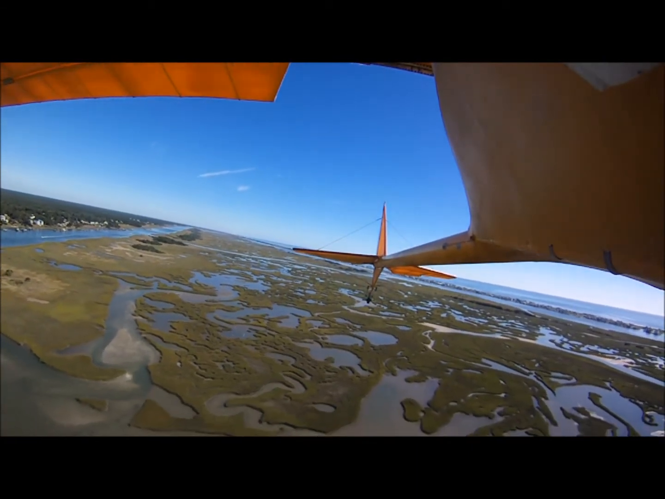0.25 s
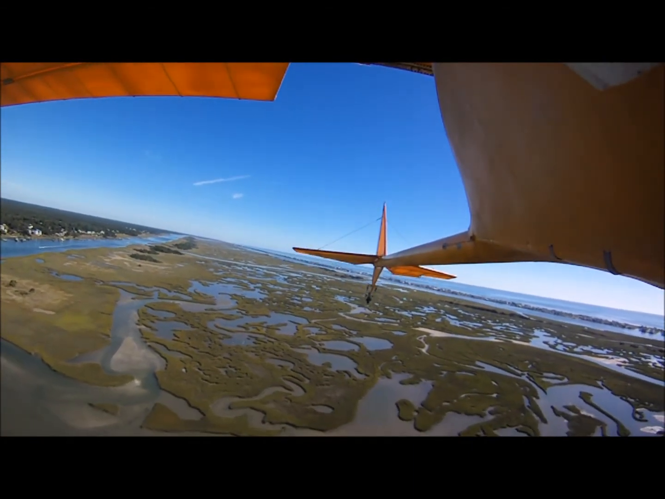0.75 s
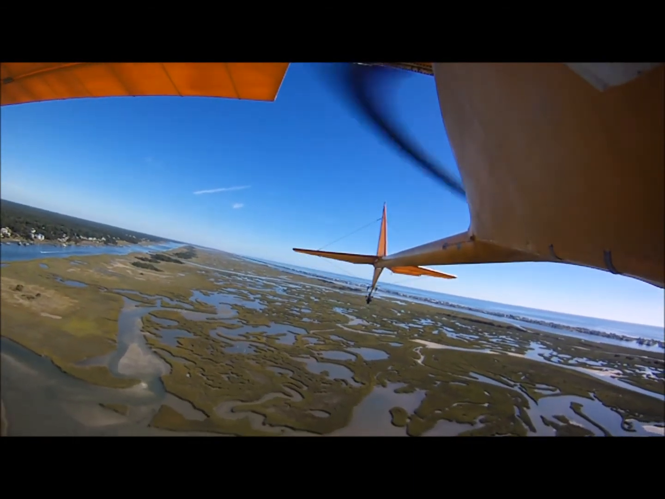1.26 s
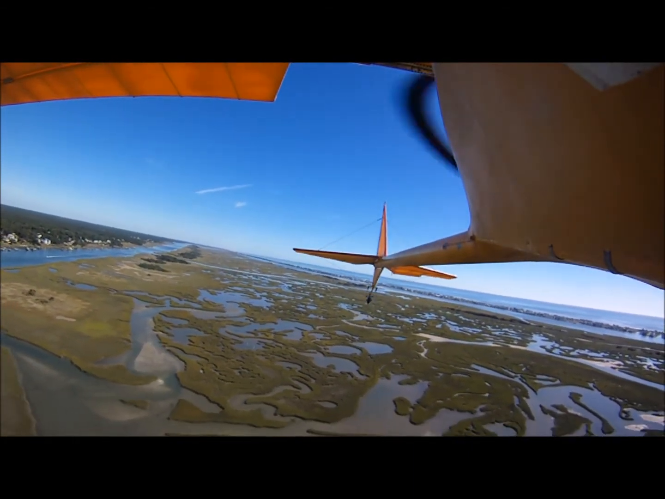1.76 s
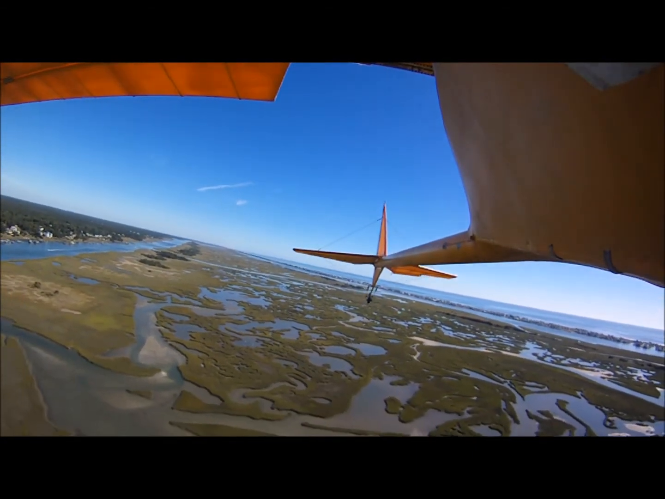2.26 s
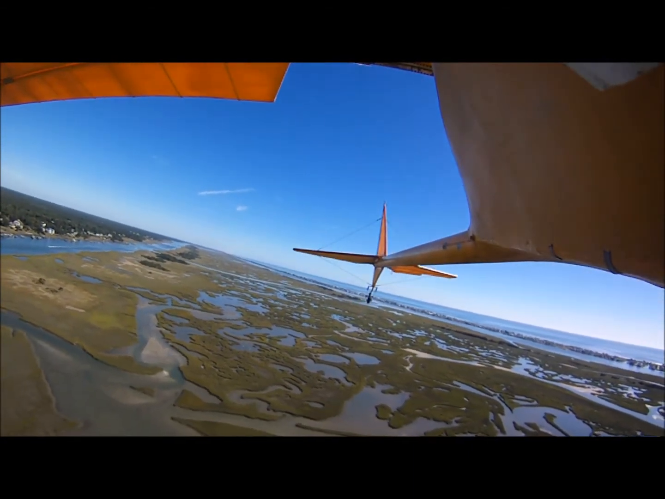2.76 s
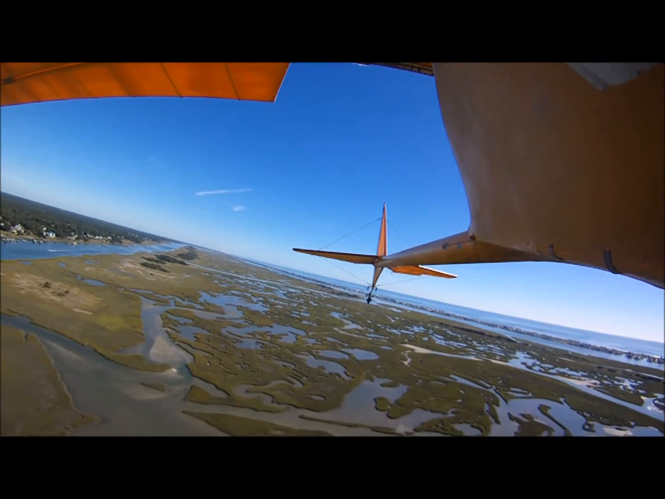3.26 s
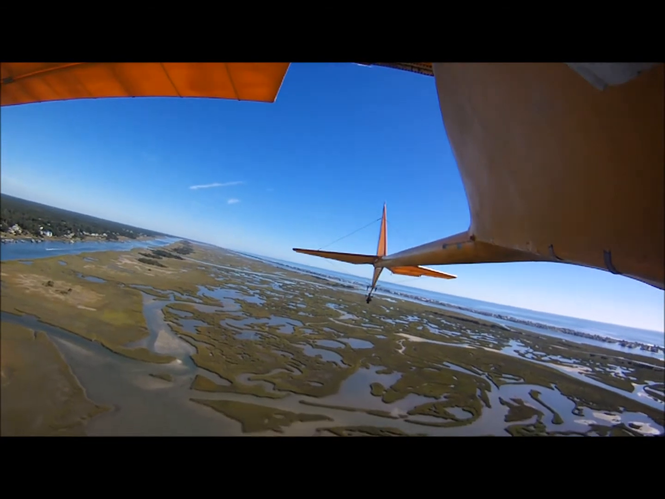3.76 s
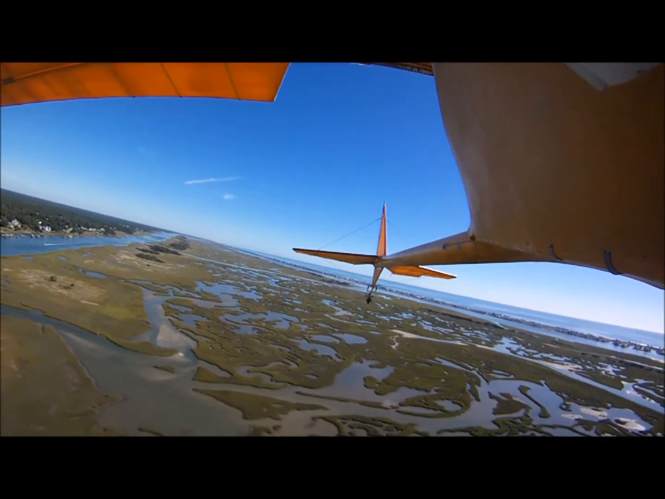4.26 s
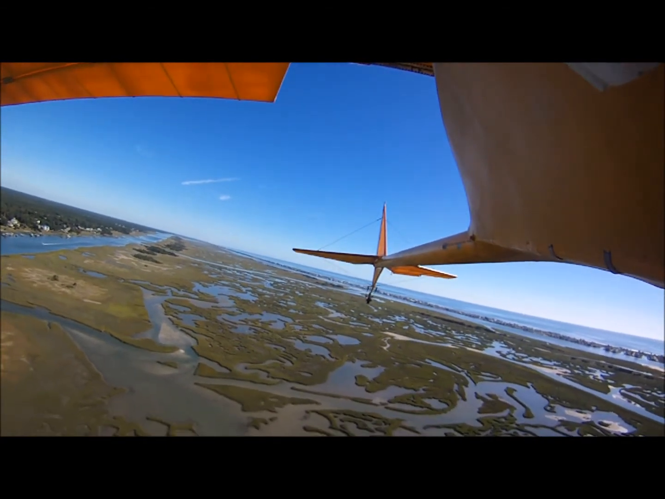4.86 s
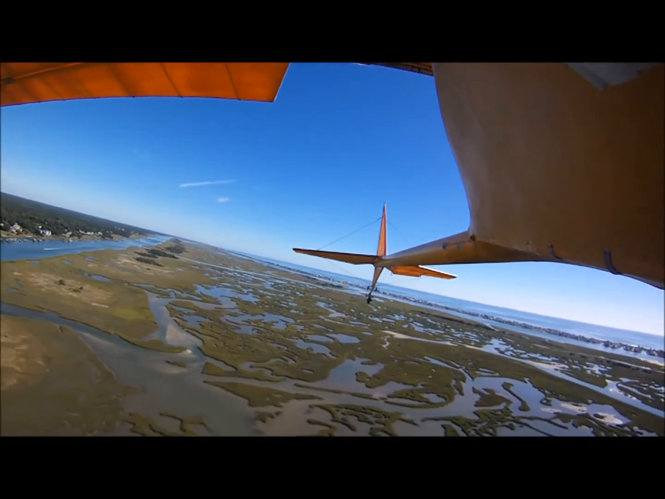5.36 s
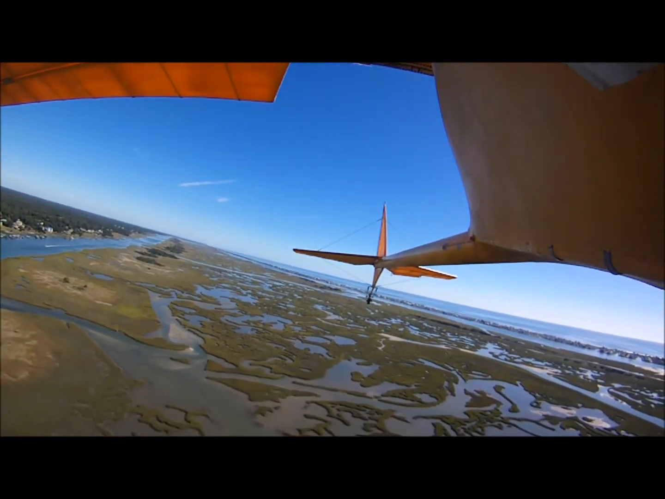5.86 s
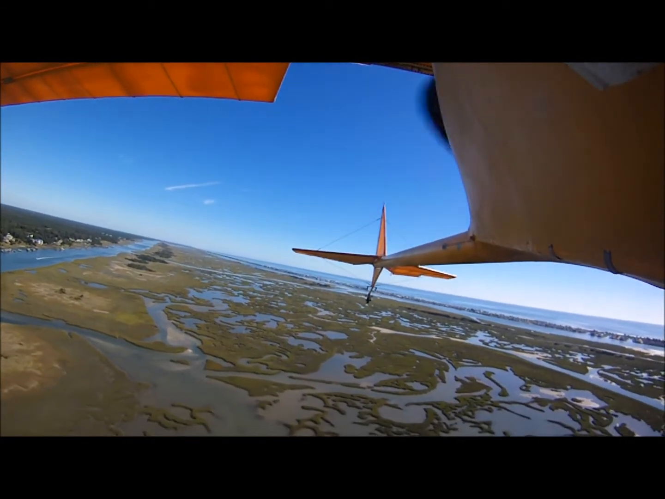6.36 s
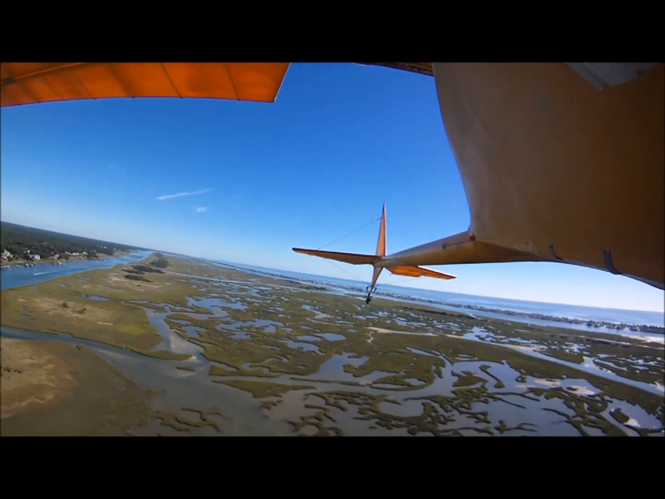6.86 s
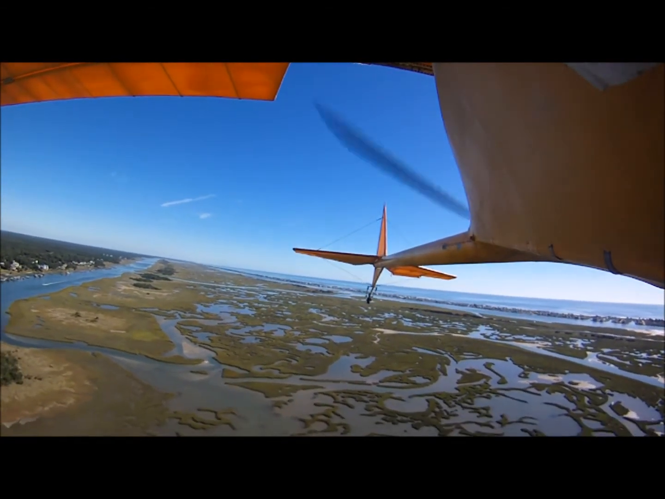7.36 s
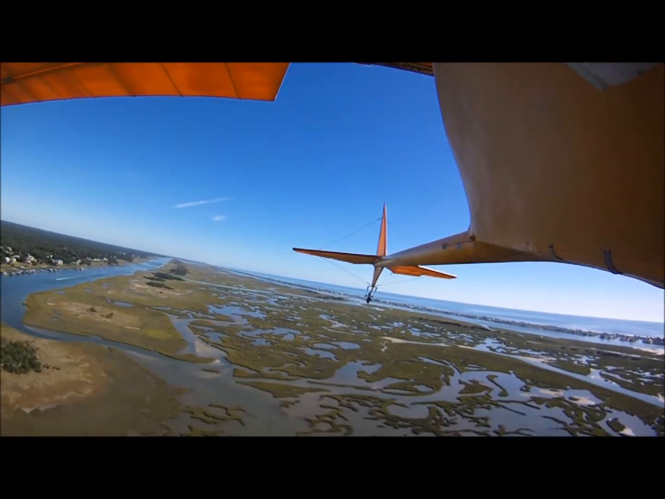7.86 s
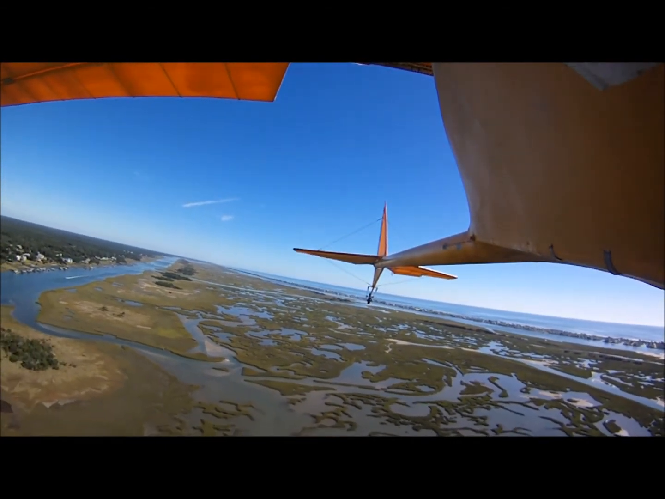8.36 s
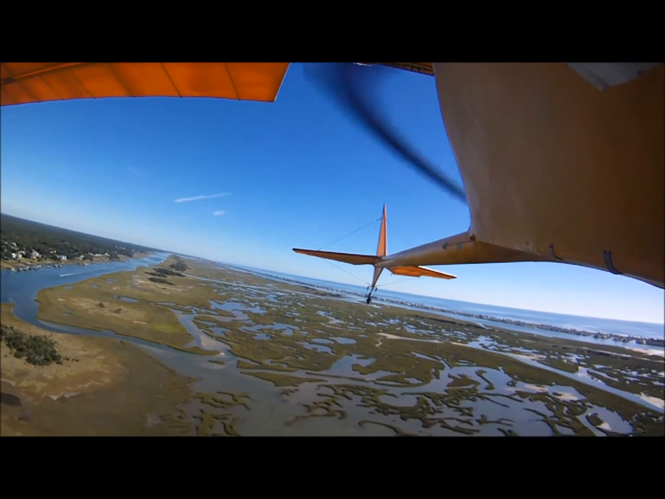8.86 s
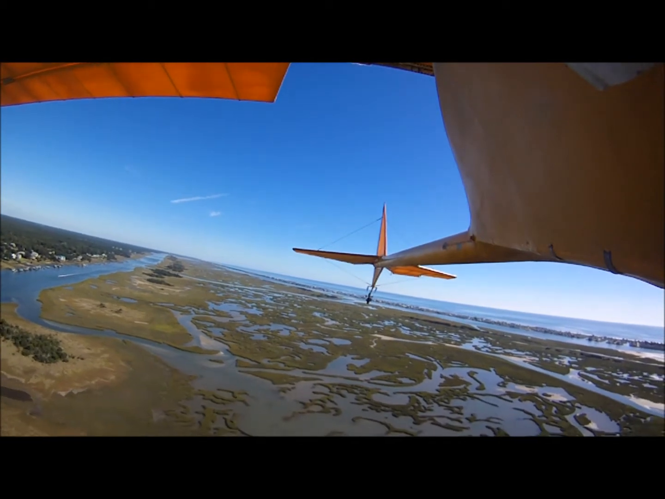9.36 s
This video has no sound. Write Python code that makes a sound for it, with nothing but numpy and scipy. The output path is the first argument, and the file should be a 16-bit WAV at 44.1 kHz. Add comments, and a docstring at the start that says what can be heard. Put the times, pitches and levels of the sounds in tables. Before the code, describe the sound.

From 0 to about 9.6 seconds, a small propeller aircraft flies at steady power, heard from a microphone fixed to its airframe. About 72 blade slaps per second merge into a rough, low buzzing drone, strongest in overtones around 300 Hz, with tiny speed drifts and uneven slaps. The engine's firing note, near 187 Hz, and its overtones beat against the propeller, giving a restless throb. A dense, grainy slipstream roar fills the lows and mids, with faint hiss, fizz and crackle above. The air builds very gradually, lifting slightly near 2.7 seconds and more clearly around 7.25. Short low wind buffets bump at about 1.6, 3.1, 4.7, 5.6, 6.2, 7.1 to 7.3 and 8.8 seconds. Small dry ticks occur sparsely, notably near 2.45, 5.6 and 8.8. The sound is close, open and echo-free, with muted extreme treble, and the drone never stops.

```python
"""A propeller drives an ultralight aircraft at steady power, heard from a camera on its airframe.
Each blade slaps the air, built as a row of harmonics that line up into a pulse.
The engine, geared to the propeller, fires about 2.6 times per blade pass and beats against it.
The slipstream is coloured noise, pulsing with the blades and swelling in gusts, with fizz and crackle on top.
Low wind buffets come in short swells, and now and then a small dry burst ticks."""
import sys
import numpy as np
from scipy import signal
from scipy.fft import rfft, irfft
from scipy.io import wavfile

SR = 44100
rng = np.random.default_rng(int(sys.argv[2]) if len(sys.argv) > 2 else 0)


def master_out(mix):
    """Clip the mix to full scale and print it as 16-bit PCM to the path in sys.argv[1]."""
    frames = np.transpose(np.atleast_2d(mix))
    ceiling = np.clip(frames, -1, 1)
    pcm = np.round(ceiling * 32767).astype(np.int16)
    wavfile.write(sys.argv[1], SR, pcm)


N = 424683
TIME = np.arange(N) / SR  # seconds

# propeller speed: (time [s], blade passes per second [Hz])
BLADE_RATE = [(0.0, 72.5), (0.21, 72.1), (0.43, 72.6), (1.21, 72.6), (1.42, 71.8), (2.38, 72.5),
              (3.19, 71.6), (4.29, 72.7), (6.03, 72.4), (7.59, 72.9), (7.94, 72.6), (9.63, 72.4)]
# propeller harmonics before bite and waver: (multiple of the blade rate [-], level [dB])
BLADE_HARMONICS = [(1, -46.4), (2, -36.1), (3, -36.4), (4, -29.0), (5, -29.7), (6, -43.8), (7, -33.1),
                   (8, -34.7), (9, -42.4), (10, -43.1), (11, -44.6), (12, -39.3), (13, -44.9), (14, -39.0),
                   (15, -44.5), (16, -40.2), (17, -46.8), (18, -43.4), (19, -50.7), (20, -46.3),
                   (21, -48.7), (22, -58.5), (23, -48.4), (24, -55.0), (25, -54.4), (26, -69.6),
                   (27, -55.7), (28, -57.4), (29, -54.0), (30, -53.2)]
# exhaust overtones before trim and waver: (multiple of the firing rate [-], level [dB])
EXHAUST_HARMONICS = [(.5, -58), (1, -34), (2, -31), (3, -38), (4, -46), (5, -53), (6, -48.5), (7, -44.5),
                     (8, -53.5)]
# broad gusts that lift all the steady air noise: (time [s], lift [dB], half length [s])
BROAD_GUSTS = [(2.7, 0.7, 0.31), (7.25, 1.5, 0.35)]
# relative spectrum of the slipstream's roar: (frequency [Hz], density [dB per Hz])
ROAR_COLOUR = [(20, -30), (50, -12), (90, -7), (160, -1.5), (450, 0.5), (800, 0), (1100, -2.5), (1500, -4),
               (2150, -9), (2600, -15), (3100, -22), (4500, -35.5), (8000, -55)]
# relative spectrum of the slipstream's hiss: (frequency [Hz], density [dB per Hz])
HISS_COLOUR = [(500, -22), (2500, 2), (3800, 0.5), (4800, -1), (6000, -5), (7400, -10), (9300, -12),
               (10200, -15.5), (11000, -19.5), (12600, -26), (13800, -27), (14600, -30), (15200, -35)]
# relative spectrum of the fizz at each blade: (frequency [Hz], density [dB per Hz])
FIZZ_COLOUR = [(2000, -20), (4500, -2), (7000, -3), (9500, 3.5), (11500, -10), (15000, -22)]
# relative spectrum of a snap or an untilted tick: (frequency [Hz], density [dB per Hz])
SNAP_COLOUR = [(500, -10), (2500, 2), (4200, 8.5), (6500, -2.5), (9000, -10.5), (12000, -26), (15000, -40)]
# gusts that buffet the camera, before the layer trim: (time [s], level [dB], half length [s])
BUFFET_SWELLS = [(1.587, -19.5, 0.028), (3.14, -23, 0.029), (4.72, -19, 0.017), (5.619, -18.5, 0.019),
                 (6.215, -21, .03), (6.388, -24, 0.028), (7.105, -24, 0.035), (7.18, -21.5, 0.03),
                 (7.26, -21, 0.027), (8.841, -20.5, 0.016)]
# relative spectrum of a buffet: (frequency [Hz], density [dB per Hz])
BUFFET_SPECTRUM = [(30, -25), (120, 3), (250, 1), (600, 10), (1200, -13), (2500, -17), (5000, -39),
                   (12000, -65)]
# small dry ticks, before the layer trim: (time [s], level [dB], brightness [dB per octave])
TICK_EVENTS = [(1.594, -34, -3), (2.4293, -30, -1), (2.4628, -33, -4), (2.467, -25, -5), (4.726, -31, -3),
               (5.606, -27, 4), (6.0135, -34, -2), (6.1937, -35, 2), (7.2393, -31, -5), (7.4508, -33, -3),
               (7.5228, -32, -1), (8.193, -33, -2), (8.8058, -25, 1)]

FIRINGS_PER_BLADE = 2.579
# air noise levels halfway through, between gusts; the airflow then grows slowly and evenly
ROAR_DB, HISS_DB, AIRFLOW_RISE_DB_PER_S = -24, -49, 0.1969
HISS_GROWTH = 1.3  # dB of hiss for each dB of roar as the air quickens
EDGE_HZ = 14950


def amp(db):
    """Decibels to gain."""
    return 10 ** (np.asarray(db) / 20)


def unit(x):
    """Scales to an rms of one."""
    return x / np.sqrt(np.mean(x ** 2) + 1e-20)


def curve(table):
    """A timed table, read at every sample."""
    return np.interp(TIME, *np.transpose(table))


def colour(x, points):
    """Filters x by a spectrum drawn on a log-frequency axis."""
    hz, db = np.transpose(points)
    bins = np.fft.rfftfreq(len(x), 1 / SR)
    gain = amp(np.interp(np.log(bins + 1), np.log(hz), db))
    return irfft(rfft(x) * gain, len(x))


def wander(rate_hz):
    """Smooth random drift of rms one, fading out above roughly the given rate."""
    coarse = TIME[::32]
    bins = np.fft.rfftfreq(len(coarse), coarse[1])
    smoothing = np.exp(-(bins / rate_hz) ** 2)
    drift = irfft(rfft(rng.standard_normal(len(coarse))) * smoothing, len(coarse))
    return np.interp(TIME, coarse, unit(drift))


def swells(table):
    """Sums the table's bell-shaped swells, with their heights still to be read as (time, height, half length)."""
    return sum(height * np.exp(-((TIME - s) / length) ** 2) for s, height, length in table)


def airflow(waver_db=0.19):
    """Strength of the slipstream in dB: a slow rise, broad gusts and a slight waver."""
    rise = AIRFLOW_RISE_DB_PER_S * (TIME - TIME.mean())
    return rise + swells(BROAD_GUSTS) + waver_db * wander(rate_hz=3)


def slap_phases(levels_db, size=128):
    """Minimum phases, which make a row of harmonics one sudden pulse with its ringing behind it."""
    padding = (1, size - len(levels_db))
    log_gain = np.log(amp(np.pad(levels_db, padding, constant_values=min(levels_db))))
    mirrored = np.r_[log_gain, log_gain[-2:0:-1]]
    return -signal.hilbert(mirrored).imag[1:len(levels_db) + 1]


def propeller(turns, air_db, bite_db=0.08, unevenness=0.11, waver_db=1.0, jitter=0.0026,
              gust_share=0.4, suction=1.17, scatter=0.52):
    """Blades cut the disturbed air behind the wing, so no two slaps are quite alike."""
    orders, levels_db = np.transpose(BLADE_HARMONICS)
    # a sharper slap lifts the upper harmonics, by bite_db per octave above the strongest
    levels_db = levels_db + bite_db * np.log2(orders / orders[levels_db.argmax()])
    # jitter is in blade passes; suction and scatter are in radians
    angle = 2 * np.pi * (turns + jitter * wander(rate_hz=16))
    # pressure dips just ahead of each slap; reflections from the airframe smear it
    phases = slap_phases(levels_db) - suction + scatter * rng.standard_normal(len(levels_db))
    slaps = sum(amp(db + waver_db * wander(rate_hz=2.0)) * np.cos(k * angle + phase)
                for k, db, phase in zip(orders, levels_db, phases))
    slap_strength = 1 + unevenness * wander(rate_hz=66)
    return np.sqrt(2) * slaps * slap_strength * amp(gust_share * air_db)


def exhaust(turns, level_db=0.17, waver_db=0.5, jitter=0.0067):
    """The firing note and its overtones; the second beats against the fifth blade harmonic."""
    # jitter is in firings
    angle = 2 * np.pi * (FIRINGS_PER_BLADE * turns + jitter * wander(rate_hz=24))
    note = sum(amp(db + waver_db * wander(rate_hz=5)) * np.cos(k * angle + 2 * np.pi * rng.random())
               for k, db in EXHAUST_HARMONICS)
    return np.sqrt(2) * amp(level_db) * note


def blade_decay(turns, decay):
    """A jump as each blade passes, dying within a fraction of the gap to the next."""
    return np.exp(-(turns % 1) / decay)


def blade_gate(turns, depth, decay):
    """Steady air with an added burst at each blade, scaled to an rms of one."""
    return unit(1 + depth * blade_decay(turns, decay))


def roar(turns, eddies, air_db, eddy_db=0.77, grain_db=1.0):
    """Grainy, turbulent slipstream, a little louder at each blade."""
    flutter = amp(eddy_db * eddies + grain_db * wander(rate_hz=420))
    air = rng.standard_normal(N) * blade_gate(turns, depth=0.3, decay=0.058) * flutter
    return unit(colour(air, ROAR_COLOUR)) * amp(ROAR_DB + air_db)


def hiss(turns, eddies, air_db, eddy_db=0.85, grain_db=1.1):
    """Fine air noise that flutters with the same eddies as the roar."""
    flutter = amp(eddy_db * eddies + grain_db * wander(rate_hz=400))
    air = rng.standard_normal(N) * blade_gate(turns, depth=0.27, decay=0.099) * flutter
    return unit(colour(air, HISS_COLOUR)) * amp(HISS_DB + HISS_GROWTH * air_db)


def fizz(turns, level_db=-64, spread_db=3):
    """Each blade leaves a brief spit of treble, now weak, now strong."""
    spits = blade_decay(turns, decay=0.19) * amp(spread_db * wander(rate_hz=52))
    return amp(level_db) * unit(colour(rng.standard_normal(N) * spits, FIZZ_COLOUR))


def crackle(air_db, level_db=-61.0, per_second=70, spread_db=3.2, gust_growth=2.2):
    """Tiny random snaps in the wind, stronger when the airflow rises."""
    sizes = amp(spread_db * np.minimum(rng.exponential(1, N), 4))
    struck = rng.random(N) < per_second / SR
    snaps = colour(sizes * struck, SNAP_COLOUR)
    return unit(snaps * amp(gust_growth * air_db)) * amp(level_db)


def buffets(level_db=-2):
    """Gusts buffet the camera as short swells of low wind noise."""
    swell = swells([(s, amp(db), length) for s, db, length in BUFFET_SWELLS])
    return amp(level_db) * swell * unit(colour(rng.standard_normal(N), BUFFET_SPECTRUM))


def ticks(level_db=-1, length_s=0.00091, size=2048):
    """Short bursts of noise with no ring, each peaking after half of length_s."""
    out = np.zeros(N + size)
    age = (np.arange(size) - size // 2) / SR
    rise = 2 * np.maximum(age, 0) / length_s
    shape = rise * np.exp(1 - rise)
    for s, db, brightness in TICK_EVENTS:
        tilted = [(hz, level + brightness * np.log2(hz)) for hz, level in SNAP_COLOUR]
        burst = shape * colour(rng.standard_normal(size), tilted)
        # equal energy whatever the tilt and the noise draw
        burst *= np.linalg.norm(shape) / np.linalg.norm(burst)
        start = round(s * SR) - size // 2
        out[start:start + size] += amp(db + level_db) * burst
    return out[:N]


def scene():
    """One shaft speed drives propeller, exhaust and air pulses; one airflow sets the slipstream's strength."""
    turns = np.cumsum(curve(BLADE_RATE)) / SR  # counted in blade passes
    eddies = wander(rate_hz=56)
    air_db = airflow()
    machine = propeller(turns, air_db) + exhaust(turns)
    slipstream = roar(turns, eddies, air_db) + hiss(turns, eddies, air_db)
    slipstream += fizz(turns) + crackle(air_db)
    return (machine + slipstream + buffets() + ticks())[None]


def record(dry):
    """The camera's band limit: a steep low-pass filter."""
    low_pass = signal.firwin(511, EDGE_HZ, window=("kaiser", 9), fs=SR)
    return signal.oaconvolve(dry, low_pass[None], "same")


dry = scene()
out = record(dry)
master_out(out)
```